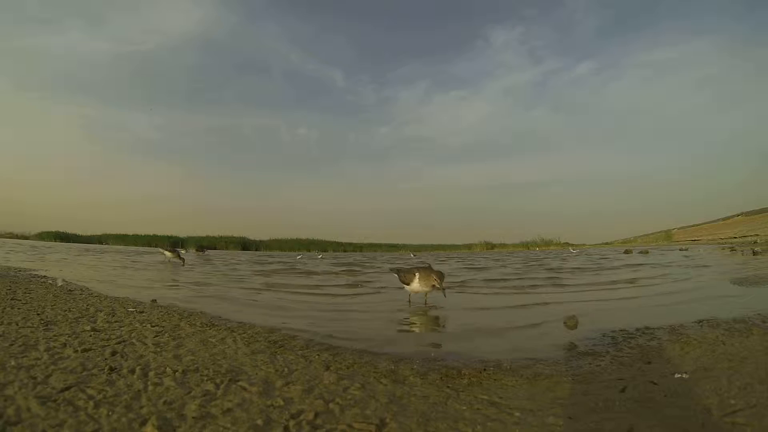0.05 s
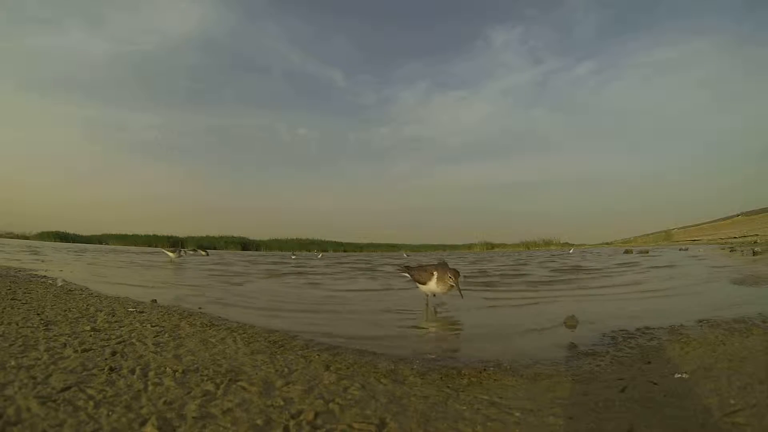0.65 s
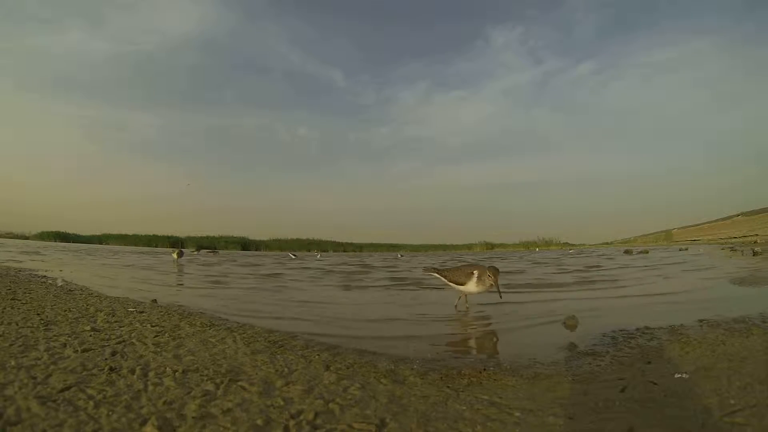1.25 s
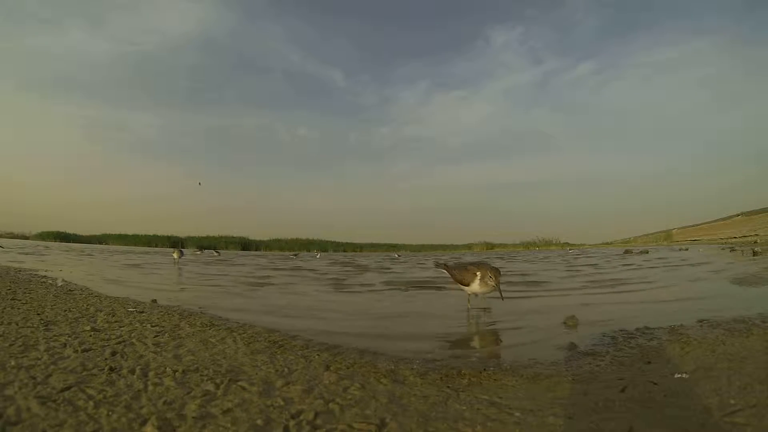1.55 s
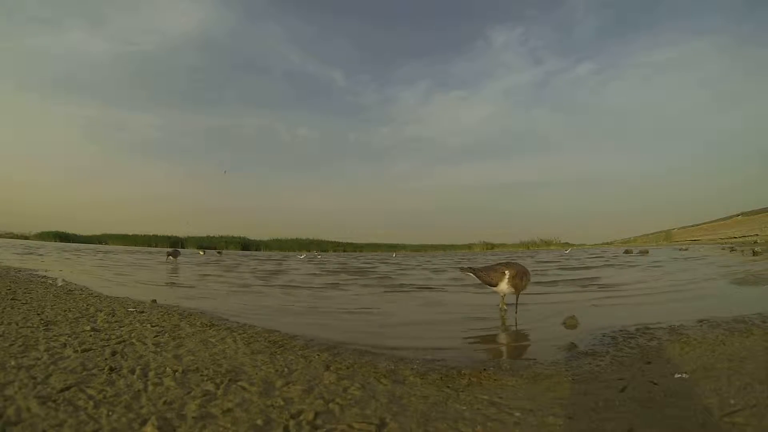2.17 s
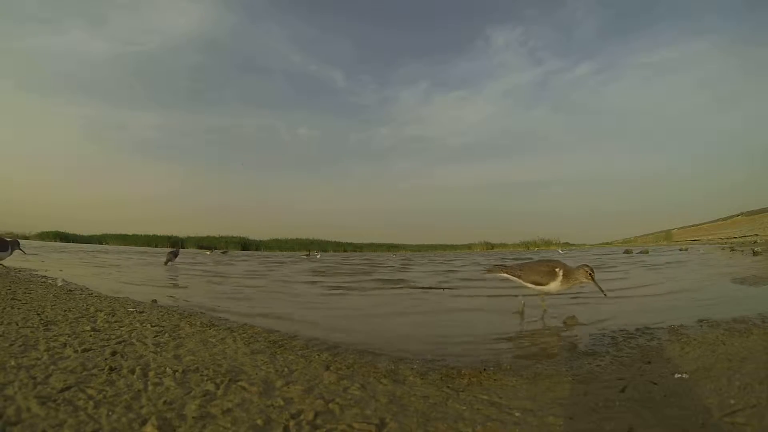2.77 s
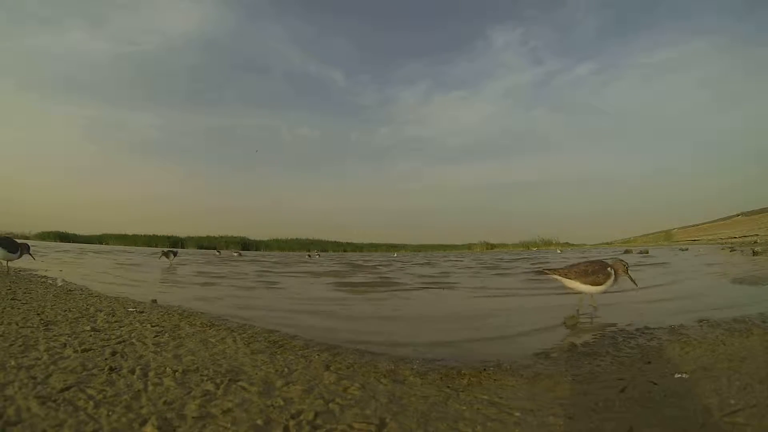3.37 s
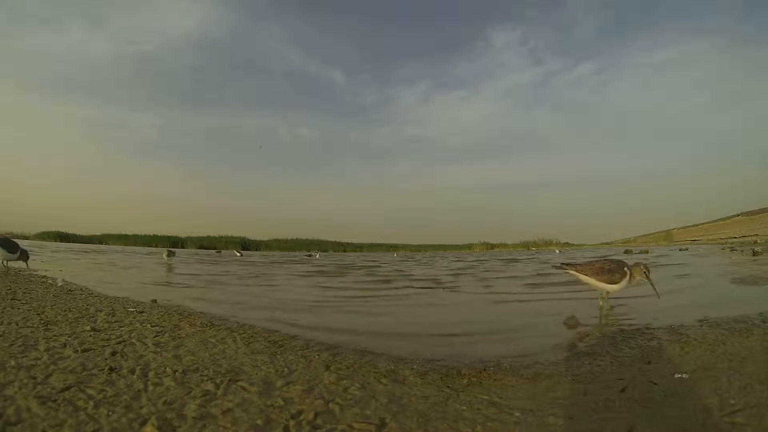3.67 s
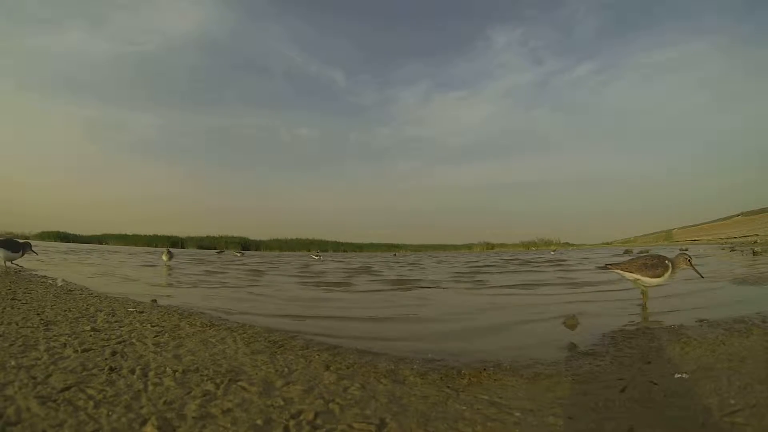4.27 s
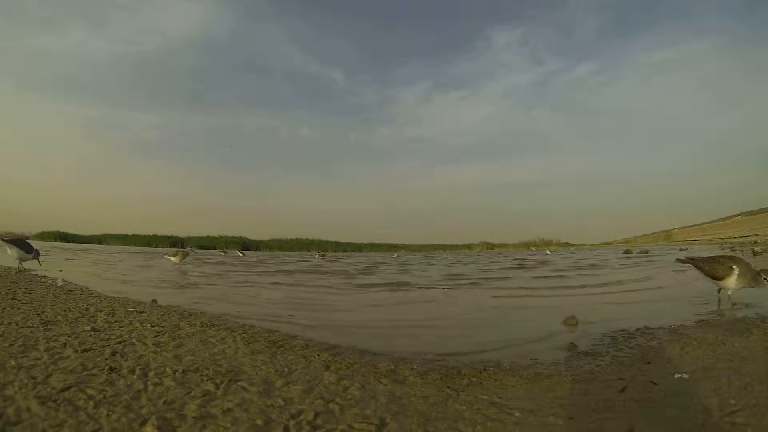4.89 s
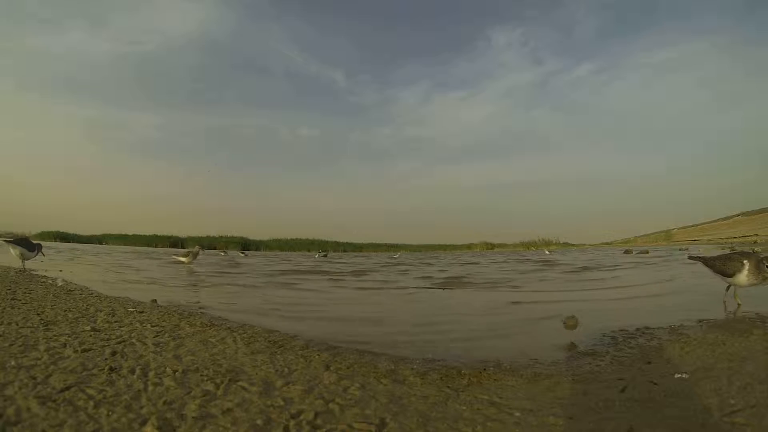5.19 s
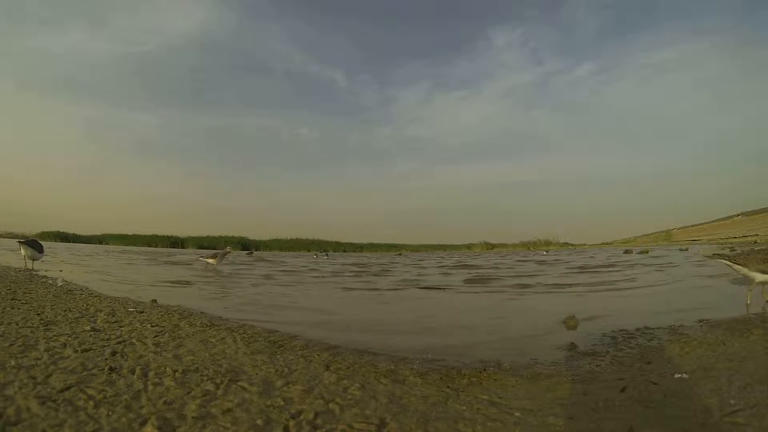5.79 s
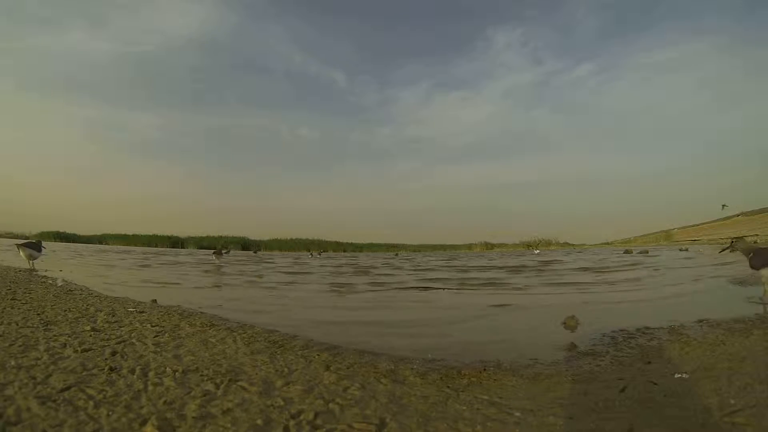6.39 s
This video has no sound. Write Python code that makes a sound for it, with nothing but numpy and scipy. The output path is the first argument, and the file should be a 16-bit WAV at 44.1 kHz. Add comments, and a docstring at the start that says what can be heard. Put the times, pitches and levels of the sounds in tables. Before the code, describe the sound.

Wind rumbles on a microphone set low on a muddy shore, swelling into low booms over a steady hiss. In the first second small wading birds give a thin peep and a scatter of tiny, falling pips, with faint wet pats of feeding. The wind gusts again midway, then one louder, slightly raspy peep sounds near the end. Faint distant pips and a thin electronic whine lie behind.

```python
"""A muddy shore: small waders feed with faint wet pats and call, two arched peeps and short, falling pips.
A camera in a closed case sits on the mud. Wind rumbles on the case and makes it boom on its mount;
its wall colours the birds. Behind lie a steady hiss, a thin electronic whine, faint regular blips
and spells of high ticking."""
import sys
import numpy as np
from scipy import signal
from scipy.fft import rfft, irfft, next_fast_len
from scipy.io import wavfile
from scipy.ndimage import uniform_filter1d, map_coordinates

SR = 44100
rng = np.random.default_rng(int(sys.argv[2]) if len(sys.argv) > 2 else 0)


def master(y):
    """Save y as 16-bit WAV."""
    cut = np.clip(np.atleast_2d(y).T, -1, 1)
    pcm = np.round(cut * 32767)  # scale
    wavfile.write(sys.argv[1], SR, pcm.astype(np.int16))


N = 284004

# arched calls: t/s, length/s, start f/Hz, top f/Hz, end f/Hz, fall exponent,
# end level/dB before the beak, swell/dB, mid-note octave/dB re tone, crack/0-1
PEEPS = [ (0.08, .054, 3020, 4660, 3080, 2.2, -55.5, 7, -34, 0),
         (4.9618, 0.048, 2950, 3530, 2900, 2.9, -45, 11, -15.5, 0.9)]
# cracked start: multiple of half the pitch, level/dB
CRACK_PARTIALS = [(1, -61.5), (2, -62), (3, -60), (5, -71)]
# short calls: t/s, length/s, start f/Hz, middle f/Hz, end f/Hz, level/dB,
# octave/dB re tone before the beak, rasp/0-1
PIPS = [ (.281, .006, 1980, 1850, 1680, -68, -15, .2), (0.3, 0.014, 2180, 2240, 2200, -54.5, -16, 0.16),
        (0.31, 0.0075, 2190, 1870, 1670, -56, -3, 0), (.3405, .009, 1980, 2070, 2020, -67, 10, 0),
        (0.349, 0.0073, 2010, 1845, 1670, -56, -3.5, .02),
        (0.379, 0.011, 2160, 2540, 2300, -59.5, -20, .22), (0.3885, 0.0063, 2170, 1860, 1670, -54.5, -6, 0),
        (0.519, 0.011, 1850, 1730, 1650, -69, -10, .4), (.543, .012, 1870, 1720, 1650, -65.5, -15, .4),
        (0.614, .01, 2250, 2180, 1950, -70, -10, .5), (0.7256, 0.013, 1930, 1900, 1770, -60.5, -3.5, 0.06),
        (0.902, 0.0092, 1950, 1850, 1600, -68, -2, .5), (0.9604, 0.0046, 2050, 2260, 2500, -61, -25, .2),
        (0.963, 0.0092, 3080, 3020, 2850, -56.5, -25, 0.2), (0.97, 0.0051, 2700, 2600, 2450, -60, -25, .5),
        (0.976, 0.0052, 2200, 1900, 1690, -58.5, -7, 0.1), (1.001, 0.012, 2220, 2245, 2170, -55.5, -9, 0),
        (1.012, .005, 2150, 2000, 1780, -64, -5, 0.1), (1.071, 0.012, 3520, 3740, 4230, -66.5, -30, 0.1),
        (2.6755, .01, 1970, 1910, 1710, -57.5, -9.5, 0.08), (5.007, 0.012, 2450, 2330, 2200, -68, -30, 0.4),
        (5.0225, 0.0044, 2100, 1830, 1600, -62.5, -20, 0.1), (5.555, .014, 3880, 4120, 3900, -71, -30, .35),
        (5.607, .011, 4600, 4570, 4400, -70, -30, .25), (6.295, .059, 4200, 4450, 4560, -73, -30, 0.1)]
BEAK_MODE = (3590, 850, 0)  # beak resonance: f/Hz, width/Hz, gain/dB
WALL_MODES = [(1750, 90, 8), (3364, 62, 2), (3830, 250, 1.5)]  # case wall: f/Hz, width/Hz, gain/dB
SHORE_DECAY = [(500, 0.18), (3000, 0.24), (9000, 0.13)]  # scatter from the banks: f/Hz, t60/s
BREEZE = [(.08, -43), (.6, -47.5), (1.1, -47.5), (1.35, -52.5), (1.9, -49.5), (2.27, -55.5), (2.55, -45.5),
          (3.15, -49), (3.5, -39.5), (3.75, -46.5), (4.28, -55.5), (4.55, -47.5), (4.85, -54.5),
          (5.2, -52.5), (5.95, -49.5), (6.44, -54)]  # push on the case: t/s, level/dB
GUSTS = [(0.234, 0.1, -41), (0.435, 0.07, -35), (0.549, 0.078, -35.5), (0.727, 0.11, -36),
         (0.88, 0.098, -41.5), (1.155, 0.15, -42.5), (2.708, 0.15, -41), (3.03, 0.03, -43),
         (3.313, 0.046, -34.5), (3.567, 0.16, -40), (3.925, 0.022, -39.5), (4.132, 0.19, -44.5),
         (4.4, 0.035, -41), (4.505, 0.15, -44), (4.68, 0.093, -45.5), (5.974, 0.11, -47)]  # single shoves: peak t/s, length/s, level/dB
SWAY_SPECTRUM = [(5, -34.5), (14, -13.5), (21, -16.5), (34, -13.5), (43, -4.5), (49, -1.5), (53, -1),
                 (58, -16), (90, -41), (200, -75)]  # case on its mount: f/Hz, relative density/dB
RUMBLE_LEVELS = [(.08, -57), (.35, -56), (.65, -52.5), (.9, -56.5), (2.3, -57.5), (3.5, -56.5),
                 (4.6, -56.5), (5.7, -57.5), (6.44, -57.5)]  # wind rumble: t/s, level/dB
RUMBLE_SPECTRUM = [(40, -23), (62, -2), (80, 1.5), (105, -1.5), (140, -3), (180, -7), (230, -8),
                   (400, -14.5), (800, -25), (1600, -33.5), (4000, -56)]  # wind rumble: f/Hz, relative density/dB
PATS = [(.222, -64, .1), (.238, -71, .06), (.255, -59, 0.025), (.279, -70, .05), (.633, -63.5, .1),
        (.716, -61, 0.045)]  # bills and feet: t/s, level/dB, t60/s
PAT_SPECTRUM = [(800, -23), (1750, 5), (2300, -1), (3100, 7), (4500, -17), (6500, -10), (8100, -1.5),
                (9500, -17), (13000, -28)]  # wet fizz: f/Hz, relative density/dB
HISS_SPECTRUM = [(150, -4.5), (500, 7), (1000, 3.5), (2300, -2), (2850, -1), (4600, -7.5), (5500, -8.5),
                 (6200, -10), (7300, -12.5), (7900, -10.5), (9400, -17), (11500, -16.5), (12600, -19),
                 (13500, -58)]  # broad hiss: f/Hz, relative density/dB
HISS_BANDS = [(1650, 250, -0.5), (5200, 340, -6), (10270, 270, -9), (11350, 300, -14.5), (15180, 360, -14)]  # narrow bands in the hiss: f/Hz, width/Hz, relative level/dB
WHINE_TONES = [(5080, -77.5, 55), (10050, -90.5, 120)]  # wavering electronic tones: f/Hz, level/dB before trim, waver/Hz
STEADY_TONES_HZ = [9830, 10430, 12647]  # steady electronic tones: f/Hz
STEADY_TONES_DB = [-102, -100, -101]  # the same tones: level/dB
TICK_SPELLS = [(.48, 1.6), (2.24, 3.28), (4.08, 5.45)]  # treble ticking: start t/s, end t/s


def birds(scatter_db=-16):
    """Calls sweeping through the wall's modes flare up and ring on, beating against the falling pitch."""
    calls = peeps() + pips() + flock()
    calls = calls + amp(scatter_db) * shore(calls)
    return filtered(calls, lambda f: 1 + sum(resonance(f, *mode) for mode in WALL_MODES))


def peeps(rise_s=.021, attack_s=.004, release_s=.003, crack_s=.015, clearing_s=.0042, octave_fade_db=38):
    """Each peep leaps up and slides away, loudest at the beak's mode; a crack rasps an octave below."""
    out = np.zeros(N + SR)
    for onset_s, length_s, start_hz, top_hz, end_hz, bend, db, swell_db, octave_db, crack in PEEPS:
        t = np.arange(int(length_s * SR)) / SR
        progress = t / length_s
        to_rise = np.clip(1 - t / rise_s, 0, 1)
        fallen = np.clip((t - rise_s) / (length_s - rise_s), 0, 1)
        pitch_hz = top_hz - (top_hz - start_hz) * to_rise ** 2.6 - (top_hz - end_hz) * fallen ** bend
        pitch_hz *= 1 + .003 * wobble(246)[:len(t)]
        gate = np.clip(np.minimum(t / attack_s, (length_s - t) / release_s), 0, 1)
        level = amp(db + swell_db * (progress - 1) + wobble(206)[:len(t)])
        clear = 1 - crack * np.clip((crack_s - release_s - t) / clearing_s, 0, 1)
        cracking = crack * np.sqrt(hump(t - crack_s / 2, crack_s))
        half_phase = np.pi * np.cumsum(pitch_hz) / SR + .12 * wobble(700)[:len(t)]
        rasp = sum(amp(partial_db) * np.sin(k * half_phase) for k, partial_db in CRACK_PARTIALS)
        tone = whistle(pitch_hz, octave_db - octave_fade_db * (progress + .5 - clear))
        tone *= np.abs(resonance(pitch_hz, *BEAK_MODE))
        out[round(onset_s * SR):][:len(t)] += gate * (clear * level * tone + cracking * rasp)
    return out[:N]


def pips(swell_db=2.6, flutter_per_s=1000, flutter_rad=2.5):
    """A pip's rasp clears as its octave comes in, mostly on a falling pitch; the beak shapes the octave."""
    tones, octaves = np.zeros((2, N + SR))
    for onset_s, length_s, start_hz, middle_hz, end_hz, db, octave_db, rasp in PIPS:
        progress = np.linspace(0, 1, int(length_s * SR))
        pitch_hz = np.polyval(np.polyfit([0, .5, 1], [start_hz, middle_hz, end_hz], 2), progress)
        rough = np.clip(2 * rasp * np.cos(np.pi * progress / 2) ** 2, 0, 1)
        flutter = map_coordinates(rng.standard_normal(256), [progress * length_s * flutter_per_s])
        phase = 2 * np.pi * np.cumsum(pitch_hz) / SR + flutter_rad * rough * flutter
        level = amp(db + swell_db * (progress - .5)) * np.sqrt(2 * np.abs(np.sin(np.pi * progress)))
        onset = round(onset_s * SR)
        tones[onset:][:len(phase)] += level * np.sin(phase)
        octaves[onset:][:len(phase)] += level * (1 - rough) * amp(octave_db) * np.sin(2 * phase)
    return tones[:N] + filtered(octaves[:N], lambda f: resonance(f, *BEAK_MODE))


def flock(count=90, start_hz=1902, fall_hz=322, length_s=.012, nearest_db=-76.5, spread_db=8):
    """Birds farther along the shore pip at random, each with the same short fall."""
    out = np.zeros(N + SR)
    progress = np.linspace(0, 1, int(length_s * SR))
    for when, pitch, distance in rng.uniform(size=(count, 3)):
        pitch_hz = start_hz * (1 + .12 * (pitch - .5)) - fall_hz * progress
        level = amp(nearest_db - spread_db * distance) * np.sin(np.pi * progress)
        out[int(when * N):][:len(level)] += level * whistle(pitch_hz, octave_db=-18)
    return out[:N]


def whistle(pitch_hz, octave_db):
    """A bird's tone: a sine and its octave."""
    return sine(pitch_hz) + amp(octave_db) * sine(2 * pitch_hz)


def shore(calls):
    """Thin scatter from the banks; the treble dies first."""
    hz, t, spectra = signal.stft(rng.standard_normal(SR // 2), SR, nperseg=256)
    decay = amp(-60 * t / along(SHORE_DECAY, hz)[:, None])
    tail = signal.istft(spectra * decay, SR, nperseg=256)[1]
    return signal.fftconvolve(calls, tail / np.linalg.norm(tail))[:N]


def wind(eddy_db=1.5, eddies_per_s=16, boom_cutoff_hz=62):
    """Breeze and gusts rock the case at its low resonance, over a broader rumble."""
    t = np.arange(N) / SR
    breeze = amp(curve(BREEZE) + eddy_db * wobble(eddies_per_s))
    gust_power = sum((amp(db) * hump(t - peak_s, length_s)) ** 2 for peak_s, length_s, db in GUSTS)
    push = np.sqrt(breeze ** 2 + gust_power)
    sway = noise(SWAY_SPECTRUM)
    sway /= np.sqrt(np.abs(uniform_filter1d(sway ** 2, size=3400)) + .011)  # push alone sets the strength
    boom = filtered(push * sway, lambda f: 1 / np.sqrt(1 + (f / boom_cutoff_hz) ** 12))
    rumble = amp(curve(RUMBLE_LEVELS) + .27 * wobble(12)) * noise(RUMBLE_SPECTRUM)
    return boom + rumble


def pats(attack_s=.00028):
    """Bills and feet make faint puffs of fizz in the shallows."""
    level = np.zeros(N + SR)
    t = np.arange(SR // 4) / SR
    for onset_s, db, t60_s in PATS:
        level[round(onset_s * SR):][:len(t)] += amp(db - 60 * t / t60_s) * (1 - np.exp(-t / attack_s))
    return level[:N] * noise(PAT_SPECTRUM)


def hiss(broad_db=-64.5, bands_db=-76):
    """Steady hiss with a few narrow, singing bands."""
    def bands(f):
        powers = (np.abs(resonance(f, hz, width_hz)) ** 3 * amp(db) ** 2 for hz, width_hz, db in HISS_BANDS)
        return np.sqrt(sum(powers))
    singing = unit(filtered(rng.standard_normal(N), bands))
    return amp(broad_db + .12 * wobble(17)) * noise(HISS_SPECTRUM) + amp(bands_db) * singing


def whine(trim_db=-2, flicker_db=1.5):
    """The electronics give two thin, wavering tones and three fainter, near-steady ones."""
    wavering = sum(amp(db) * sine(hz + waver_hz * wobble(160)) for hz, db, waver_hz in WHINE_TONES)
    steady = sum(amp(db) * sine(hz + 2.4 * wobble(160))
                 for hz, db in zip(STEADY_TONES_HZ, STEADY_TONES_DB))
    return amp(trim_db + flicker_db * wobble(90)) * wavering + steady


def blips(first_s=.1, period_s=.25, length_s=.034, pitch_hz=5500, waver_hz=50, level_db=-81):
    """The electronics blip faintly at a steady beat."""
    from_beat_s = (np.arange(N) / SR - first_s + period_s / 2) % period_s - period_s / 2
    return amp(level_db) * hump(from_beat_s, length_s) * sine(pitch_hz + waver_hz * wobble(300))


def ticking(centre_hz=11230, width_hz=300, level_db=-81.5, spread_db=2.5, ticks_per_s=19, duty=.52):
    """Thin, uneven ticking comes and goes high in the treble."""
    t = np.arange(N) / SR
    active = sum((t > start_s) & (t < end_s) for start_s, end_s in TICK_SPELLS)
    cycle = (ticks_per_s * t + .6 * wobble(11)) % 1
    level = amp(level_db + spread_db * wobble(20))
    band = unit(filtered(rng.standard_normal(N), lambda f: resonance(f, centre_hz, width_hz) ** 2))
    return level * active * hump(cycle - .5, duty) * band


def amp(db):
    """Decibels to gain."""
    return 10 ** (np.asarray(db) / 20)


def unit(x):
    """Scale to rms 1."""
    return x / np.sqrt(np.mean(x ** 2) + 1e-20)


def sine(hz):
    """Sine of rms 1 from one frequency per sample."""
    return np.sqrt(2) * np.sin(2 * np.pi * np.cumsum(hz) / SR)


def hump(t, length):
    """Half cosine of height 1, centred on t = 0."""
    return np.cos(np.pi * np.clip(t / length, -.5, .5))


def along(points, hz):
    """Interpolate (f/Hz, value) points on a log axis."""
    f, values = np.transpose(points)
    return np.interp(np.log(hz + 1), np.log(f + 1), values)


def curve(points):
    """Interpolate (t/s, value) points to every sample."""
    return np.interp(np.arange(N) / SR, *np.transpose(points))


def wobble(knots_per_s):
    """Smooth random curve, rms near 1."""
    knots = rng.standard_normal(int(N * knots_per_s / SR) + 4)
    return map_coordinates(knots, [np.arange(N) * knots_per_s / SR])


def filtered(x, response):
    """Apply a complex frequency response."""
    size = next_fast_len(N + SR // 2)
    return irfft(rfft(x, size) * response(np.fft.rfftfreq(size, 1 / SR)), size)[:N]


def resonance(f, hz, width_hz, db=0):
    """Causal response of one mode."""
    return amp(db) * 1j * f * width_hz / (hz * hz - f * f + 1j * f * width_hz)


def noise(spectrum):
    """Coloured noise of rms 1."""
    return unit(filtered(rng.standard_normal(N), lambda f: amp(along(spectrum, f))))


def scene():
    """Birds, wind and background at one microphone."""
    return (birds() + pats() + wind() + hiss() + whine() + blips() + ticking())[None]


def record(dry, silent_s=.071, fade_in_s=.009, band_limit_hz=15300):
    """The camera's sound opens after a moment; nothing passes above its band limit."""
    opening = np.clip((np.arange(N) / SR - silent_s) / fade_in_s, 0, 1)
    return filtered(dry[0] * opening, lambda f: f < band_limit_hz)[None]


dry = scene()
out = record(dry)
master(out)
```